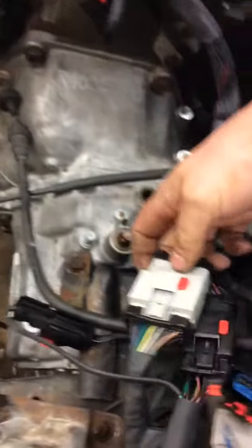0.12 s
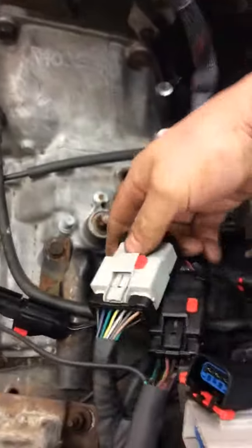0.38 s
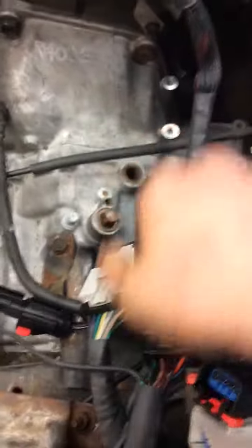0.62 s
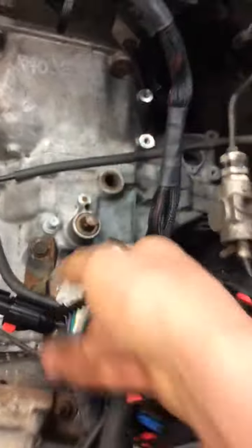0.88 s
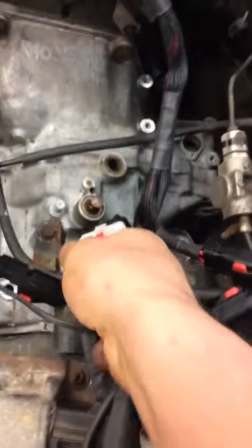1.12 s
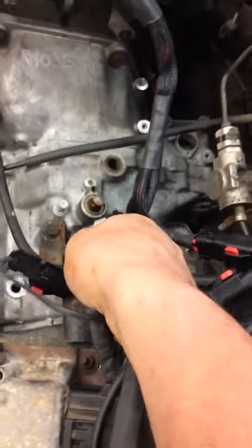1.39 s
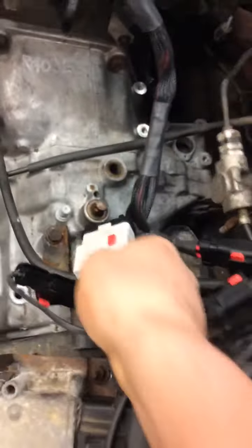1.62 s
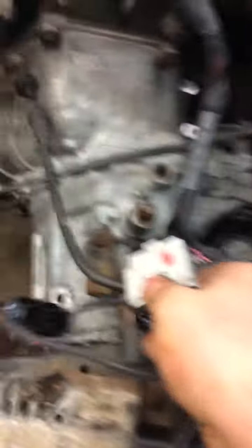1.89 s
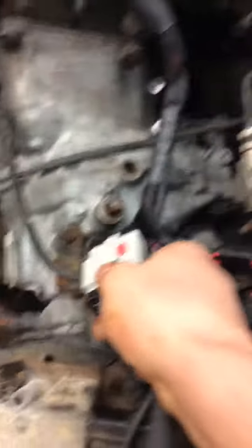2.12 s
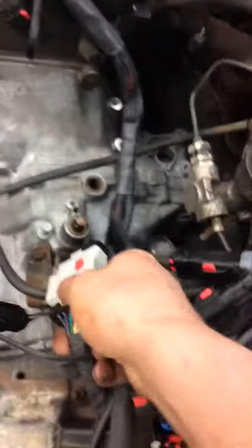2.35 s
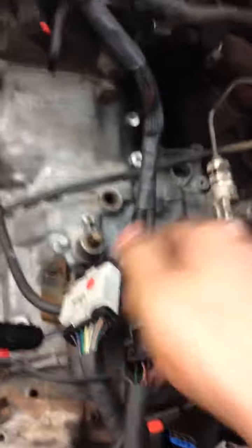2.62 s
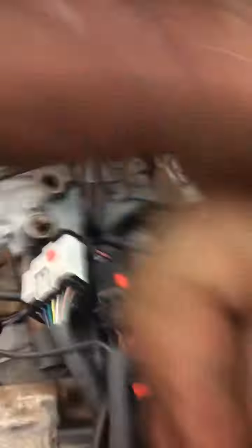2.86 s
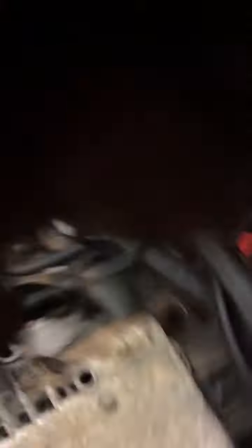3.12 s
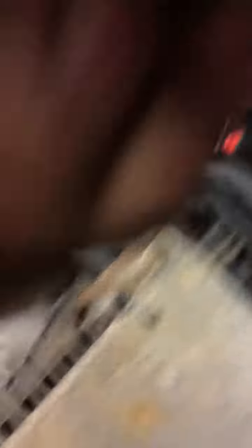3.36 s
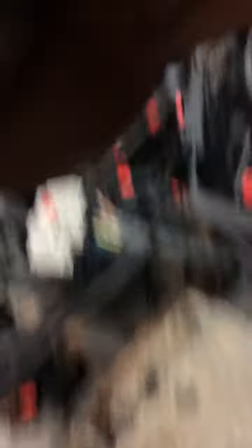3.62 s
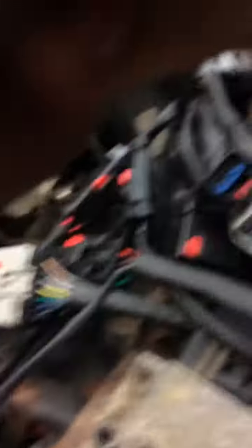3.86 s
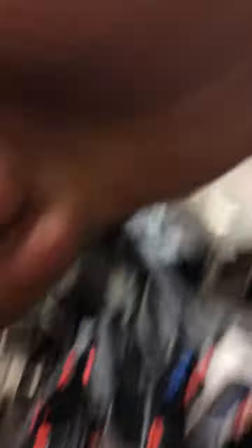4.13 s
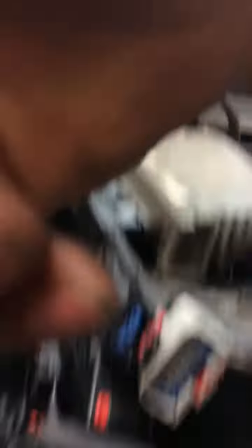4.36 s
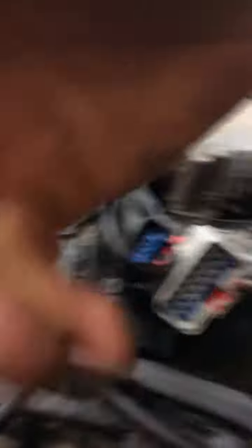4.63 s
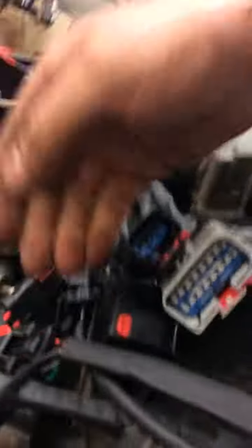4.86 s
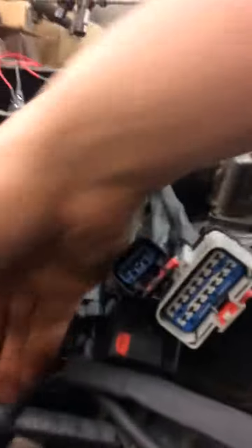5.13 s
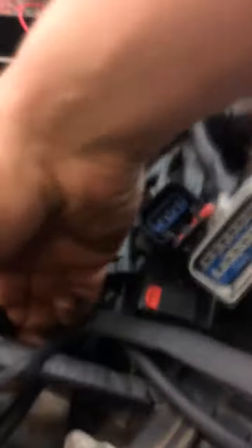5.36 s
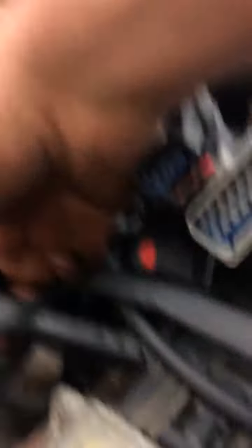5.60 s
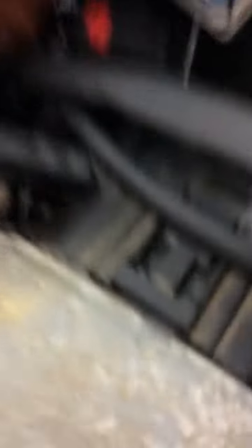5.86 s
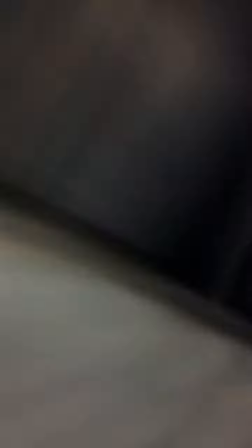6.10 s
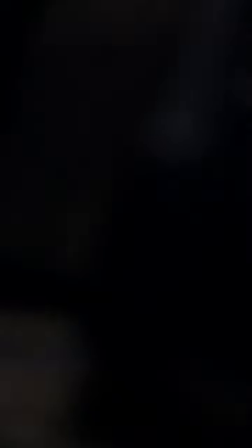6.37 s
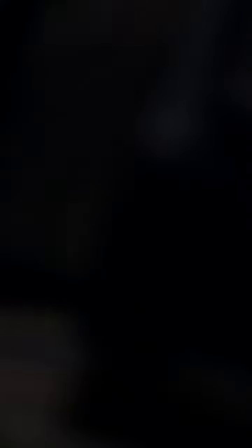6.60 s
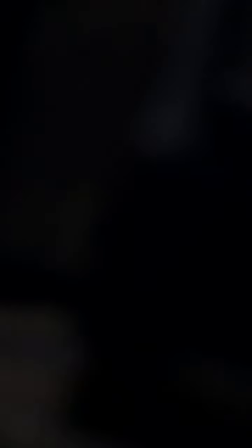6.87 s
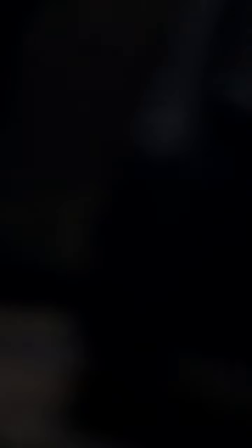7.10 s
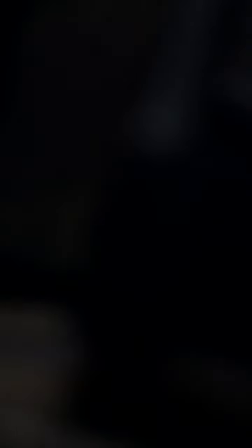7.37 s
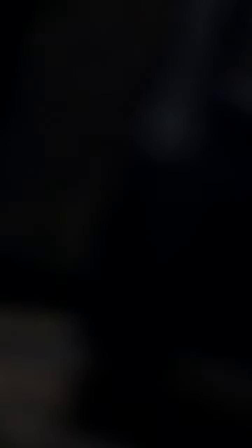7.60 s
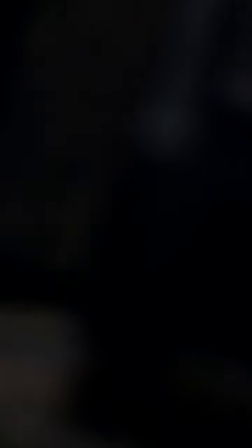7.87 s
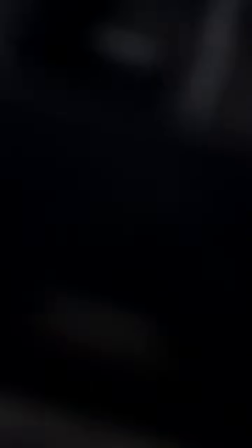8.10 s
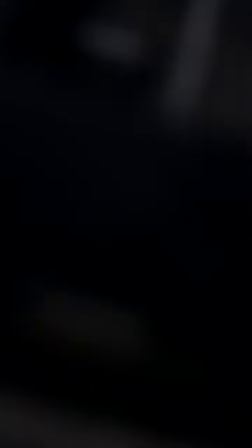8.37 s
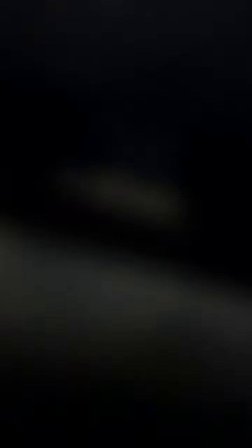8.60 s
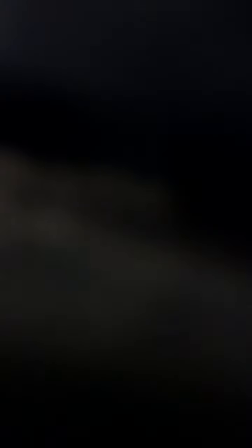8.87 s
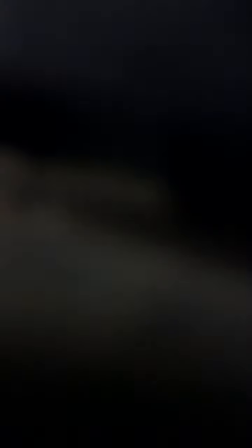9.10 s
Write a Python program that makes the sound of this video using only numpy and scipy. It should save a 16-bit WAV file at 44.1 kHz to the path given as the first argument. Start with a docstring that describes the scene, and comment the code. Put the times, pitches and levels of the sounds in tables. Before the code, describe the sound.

Sparse plastic clicks and faint wire crackle near the microphone, then louder knocks, snaps and rattling clatter as wiring plugs are handled over an engine.

```python
"""Faint crackle of taped wires and small plastic clicks, then louder clatter: hands pull wiring plugs apart
over an engine, close to a hand-held phone in a quiet shop. Clicks are noise blows ringing plastic modes;
the wires are snapping noise shaped by tugs and slides; knocks are low swings through the phone's case.
Fingers hiss as noise; quick runs of sharp kicks creak and buzz; a faint whine is gliding narrow noise."""
import sys
import numpy as np
from scipy import signal
from scipy.fft import rfft, irfft
from scipy.io import wavfile

SR = 44100
rng = np.random.default_rng(int(sys.argv[2]) if len(sys.argv) > 2 else 0)


def gain_from_db(level_db):
    """Turn a decibel level (scalar or array-like) into a linear amplitude factor."""
    decades = np.asarray(level_db, float) / 20
    return 10 ** decades


def wav_record(signal):
    """Record a signal, one row per channel, as 16-bit PCM in the file named by sys.argv[1]."""
    frames = np.transpose(np.atleast_2d(signal))
    bounded = np.clip(frames, -1, 1)
    # unit amplitude maps onto the largest positive 16-bit level
    quanta = np.round(bounded * 32767).astype(np.int16)
    wavfile.write(sys.argv[1], SR, quanta)


N = 407043
PORT_HZ = 8700  # resonance of the microphone port


def evened(x):
    """Scales to rms 1."""
    return x / np.sqrt(np.mean(x ** 2) + 1e-20)


def peaked(x):
    """Scales to peak 1."""
    return x / (abs(x).max() + 1e-20)


def coloured(x, points):
    """Shapes x by a spectrum, interpolated over log frequency, and scales to rms 1."""
    f, db = np.transpose(points)
    hz = np.fft.rfftfreq(len(x), 1 / SR)
    gain_db = np.interp(np.log(hz + 1), np.log(f + 1), db)
    return evened(irfft(rfft(x) * gain_from_db(gain_db), len(x)))


def resonate(x, hz, width_hz):
    """Two-pole resonance of about unit gain at hz."""
    r = np.exp(-np.pi * width_hz / SR)
    return signal.lfilter([1 - r * r, 0, r * r - 1], [2, -4 * r * np.cos(2 * np.pi * hz / SR), 2 * r * r], x)


def treble(x, hz):
    """High-pass, second order."""
    return signal.sosfilt(signal.butter(2, hz, "high", fs=SR, output="sos"), x)


def add(mix, s, sound):
    """Mixes sound in at time s."""
    part = mix[max(round(s * SR), 0):][:len(sound)]
    part += sound[:len(part)]


def crackle(per_s, spread_db, grain_s, smooth):
    """Noise whose level jumps with each small snap and dies away, over a smooth share."""
    snap_here = rng.random(N) < per_s / SR
    size = gain_from_db(spread_db * np.minimum(rng.exponential(1, N), 4)) * snap_here
    level = signal.lfilter([1], [1, -np.exp(-1 / (grain_s * SR))], size)
    return (evened(level) + smooth) * rng.standard_normal(N)


def swell(t, start, length, peak, edge_db, lift_db_per_s):
    """Level in dB of one stroke: an arch over its length, falling away steeply outside."""
    u = (t - start) / length
    from_peak = np.where(u < peak, (peak - u) / peak, (u - peak) / (1 - peak))
    outside_s = np.maximum(np.maximum(start - t, t - start - length), 0)
    return -edge_db * np.minimum(from_peak, 1) ** 2 - lift_db_per_s * outside_s


# plastic clicks and clatter:
# (time [s], body peak [dB], main ring [Hz], scatter t60 before limits [s], treble relative to body [dB])
CLICK_HITS = [(0.1673, -36, 6600, 0.026, -5), (0.2582, -40.5, 2830, 0.016, 2.5),
              (0.3215, -37.5, 6400, 0.025, -0.5), (0.7572, -40.5, 5100, 0.26, 0),
              (1.027, -29.5, 973, 0.049, -4.5), (1.0255, -15, 3490, 0.037, -6.5),
              (1.1035, -18.5, 4650, 0.097, -6), (1.1095, -17.5, 1940, 0.04, -1),
              (1.144, -28, 3820, 0.032, -11), (1.151, -33, 1970, 0.022, -21),
              (1.438, -47.5, 870, 0.061, -4), (1.5468, -46.5, 815, 0.13, 5),
              (1.604, -37.5, 2930, 0.017, -8.5), (1.7684, -18, 4150, 0.0068, -2.5),
              (1.8082, -30, 1700, 0.034, 8), (1.896, -49.5, 930, 0.058, 5.5), (2.1361, -42, 1040, 0.11, 13),
              (2.1815, -29, 3040, 0.045, 7.5), (2.2155, -30, 1590, 0.022, -35),
              (2.228, -38.5, 1590, 0.06, -34), (2.5552, -49.5, 2090, 0.074, 5),
              (3.185, -25.5, 7050, 0.067, 0.5), (3.4617, -5, 7000, 0.003, -3),
              (3.543, -30.5, 577, 0.025, -31), (3.6091, -41, 604, 0.033, -27),
              (3.7606, -12, 610, 0.0036, -27), (3.7773, -27, 2030, 0.039, -3),
              (3.835, -35.5, 730, 0.02, -12), (4.0617, -23, 710, 0.01, -22), (4.1133, -23.5, 576, 0.025, 2),
              (4.516, -16, 718, 0.0091, -16.5), (4.5326, -10, 790, 0.0063, -17.5),
              (4.552, -24.5, 3320, 0.032, 2.5), (4.7481, -20.5, 2430, 0.009, -6),
              (5.063, -41, 3030, 0.04, -24), (5.1125, -24.5, 4750, 0.014, -6),
              (5.17, -32, 5950, 0.015, 4.5), (5.2632, -37.5, 1610, 0.06, -1),
              (5.3431, -18, 794, 0.008, -18), (5.413, -22, 1460, 0.0088, -32),
              (5.431, -21.5, 1564, 0.028, -20), (5.7773, -25, 950, 0.03, 5),
              (5.869, -34.5, 1070, 0.045, -8.5), (5.92, -47, 1462, 0.044, 2.5),
              (6.192, -9, 1086, 0.03, -10.5), (6.2632, -5, 1090, 0.0034, -15),
              (6.2737, -12.5, 1290, 0.0038, -10), (6.2825, -20, 2000, 0.008, -4),
              (6.3522, -8.5, 1295, 0.035, -10), (6.372, -4, 1470, 0.0068, -6),
              (6.39, -7.5, 1930, 0.012, -10.5), (6.45, -32, 1420, 0.02, 1),
              (6.761, -38.5, 620, 0.094, -38.5), (6.8, -34.5, 2000, 0.025, -5),
              (6.8165, -39, 1490, 0.012, -12), (6.82, -40, 620, 0.036, -40),
              (6.859, -35.5, 4300, 0.1, -1.5), (7.098, -46.5, 710, 0.06, -32.5),
              (7.2538, -35.5, 3490, 0.041, -16), (7.296, -36.5, 1770, 0.066, -33),
              (7.328, -26.5, 1970, 0.015, -6), (7.4353, -36.5, 5000, 0.045, 4.5),
              (7.5498, -34, 1820, 0.017, -4), (7.592, -39, 2050, 0.028, -36),
              (7.6082, -34, 1740, 0.0057, -25), (7.6203, -34.5, 4430, 0.03, -2),
              (7.7245, -30, 446, 0.093, -11), (7.7775, -37.5, 650, 0.058, -44), (7.89, -22, 6600, 0.053, 1),
              (7.9118, -15, 4130, 0.027, 2), (7.9274, -23.5, 4100, 0.019, 1.5),
              (7.971, -37, 760, 0.084, -38), (8.2407, -29, 2570, 0.013, -8),
              (8.4892, -7, 1930, 0.019, -7.5), (8.4948, -10.5, 1660, 0.047, -2),
              (8.5364, -19.5, 3600, 0.015, -5), (8.5567, -21, 2020, 0.013, -8),
              (8.567, -11.5, 688, 0.0042, -8), (8.5762, -6.5, 5780, 0.021, -6),
              (8.5917, -9.5, 930, 0.005, -28), (8.622, -14.5, 3370, 0.011, -3),
              (8.6285, -4.5, 2160, 0.0093, -35), (8.6505, -10.5, 2080, 0.031, -7.5),
              (8.6635, -10, 2270, 0.035, -27), (8.6925, -5, 2270, 0.013, -19),
              (8.699, -5, 4020, 0.046, -12.5), (8.7838, -31, 5840, 0.043, 4),
              (8.8035, -29, 4840, 0.015, -1), (8.818, -19, 5300, 0.028, 4), (8.8449, -18, 4450, 0.04, -0.5),
              (8.898, -11.5, 4950, 0.036, -6), (8.9175, -21.5, 5300, 0.033, -2),
              (8.9598, -37.5, 1490, 0.036, -30), (8.983, -39, 1790, 0.03, -7),
              (9.061, -22.5, 2070, 0.053, -15), (9.074, -22.5, 1930, 0.027, 1),
              (9.148, -33.5, 3570, 0.049, -0.5), (9.199, -34, 5640, 0.021, -12)]
# faint ticks of wire ends and latches: (time [s], body peak [dB], main ring [Hz])
TICK_HITS = [(0.566, -38, 7500), (2.991, -56, 3320), (5.974, -60, 638), (6.014, -43, 1210),
             (6.529, -46, 5160), (6.594, -43.5, 4780), (6.832, -37, 2000), (7.196, -47, 1770),
             (7.992, -43, 1460), (8.266, -43, 600), (8.3622, -45.5, 3300), (8.41, -47, 690)]
TICK_T60_S, TICK_TREBLE_DB = 0.0089, 1.5


def clicks():
    """A crack and a dying scatter of contacts ring the struck part and the modes around it."""
    out, t = np.zeros(N), np.arange(7000) / SR
    hits = CLICK_HITS + [(*tick, TICK_T60_S, TICK_TREBLE_DB) for tick in TICK_HITS]
    dull = signal.butter(2, 6000, fs=SR, output="sos")
    for (s, db, hz, t60, treble_db), grit in zip(hits, rng.standard_normal((len(hits), len(t)))):
        length = np.clip(t60, .004, .2)
        scatter = gain_from_db(-60 * t / length) * (1 - np.exp(-t / (0.024 * length)))  # long ones build up more slowly
        crack = gain_from_db(1.5 - 60 * t / 0.0033)
        blow = grit * (abs(grit) * scatter + crack) * (1 - np.exp(-t / 0.00019))
        near = resonate(resonate(blow, hz, 2.2 * hz), hz, 2 * hz)
        touch_db = 5 * grit[-len(HOUSING_MODES):]
        rings = resonate(blow, hz, .13 * hz) + gain_from_db(2) * housing(near, touch_db, length)
        ping = resonate(blow, hz, max(0.045 * hz, 2 / length))
        ping *= np.linalg.norm(rings) / np.linalg.norm(ping)
        ping_db = -3 + .5 * max(-6 - treble_db, 0)  # dull knocks ring more purely
        body = rings + gain_from_db(-1.0) * near + gain_from_db(ping_db) * ping
        top = resonate(treble(blow, 3200), PORT_HZ, 3800) + gain_from_db(-6.5) * treble(blow, 9500)
        add(out, s, gain_from_db(db) * (peaked(signal.sosfilt(dull, body)) + gain_from_db(treble_db) * peaked(top)))
    return out


# modes of plugs and loom: (frequency [Hz], level [dB], decay scale before limits [s])
HOUSING_MODES = [(457, 10, 0.0099), (688, 11.5, 0.011), (1023, 2, 0.013), (1484, 6, 0.0066),
                 (1720, -10.5, 0.0078), (2084, 0, 0.0032), (2510, -5.5, 0.0035), (3200, 0, 0.0061),
                 (3600, -5, 0.017), (4540, -12.5, 0.014), (5950, -16, 0.072)]


def housing(x, weights_db, held_s=np.inf):
    """Modes of plugs and loom, weighted by where the part is touched; held_s caps their decay scale."""
    out = 0
    for (hz, db, decay_s), weight_db in zip(HOUSING_MODES, weights_db):
        width_hz = 1.7 / min(max(decay_s, .008), held_s)
        out = out + gain_from_db(db + weight_db) * resonate(x, hz, width_hz)
    return out


# metal under the plugs: (frequency [Hz], level [dB], decay scale [s])
CASTING_MODES = [(930, 2.5, 0.22), (1400, -7, 0.13), (1790, -10.5, 0.094), (1930, 0, 0.087),
                 (2870, -10, 0.063), (3490, -4.5, 0.12), (3900, -8.5, 0.15), (4300, -4.5, 0.095),
                 (4650, -3.5, 0.15), (5780, -0.5, 0.069)]
CASTING_UNTIL_S = 2.7


def casting(blows):
    """Narrow modes of the metal casting, set ringing by the early blows, with the energy of those blows."""
    early = blows * (np.arange(N) < CASTING_UNTIL_S * SR)
    ring = sum(gain_from_db(db) * np.sqrt(decay_s) * resonate(early, hz, 5 / min(decay_s, .15))
               for hz, db, decay_s in CASTING_MODES)
    return ring * np.linalg.norm(early) / np.linalg.norm(ring)


def engine_bay(x):
    """Short dense reflections off the metal nearby."""
    t = np.arange(SR // 3) / SR
    signs = rng.choice([-1., 0, 0, 0, 0, 0, 0, 0, 0, 1.], len(t))  # one tap in five
    taps = signs * gain_from_db(-60 * t / 0.041) * (t > .002)
    return signal.oaconvolve(x, taps / np.linalg.norm(taps))[:N]


# knocks through the case: (time of envelope peak [s], swing level [dB], frequency [Hz], t60, at least 0.015 [s])
KNOCKS = [(1.0469, -26.5, 338, 0.062), (1.12, -24, 321, 0.057), (1.14, -42.5, 131.4, 0.61),
          (1.812, -37, 194.6, 0.19), (1.833, -54, 197, 0.84), (2.2, -46, 191, 0.4), (3.159, -40, 78, 0.047),
          (3.4616, -5.5, 123.5, 0.015), (3.544, -26, 177, 0.059), (3.7599, -9, 188.2, 0.021),
          (3.836, -18, 162, 0.028), (4.0652, -21.5, 211, 0.025), (4.1139, -14.5, 314, 0.013),
          (4.517, -20.5, 233, 0.018), (4.532, -10.5, 270, 0.011), (4.5547, -22.5, 188.0, 0.035),
          (4.746, -26.5, 159, 0.066), (5.113, -20, 385, 0.05), (5.3455, -17, 257, 0.036),
          (5.413, -13, 275, 0.012), (5.784, -28, 239, 0.017), (6.1905, -16, 172, 0.017),
          (6.206, -23, 469, 0.12), (6.2657, -18.5, 168, 0.042), (6.2756, -31, 287, 0.013),
          (6.3537, -13.5, 120.5, 0.044), (6.3754, -18, 151, 0.014), (6.3976, -20.5, 96, 0.05),
          (7.2445, -44, 404, 0.03), (7.733, -35, 147.5, 0.12), (7.9476, -35.5, 324, 0.079),
          (8.478, -17.5, 193, 0.013), (8.491, -15, 190, 0.011), (8.56, -22, 287, 0.15),
          (8.5824, -16, 375, 0.036), (8.6043, -9, 181, 0.065), (8.633, -12, 178.0, 0.014),
          (8.6527, -17, 143, 0.14), (8.727, -34.5, 193.3, 0.43), (9.0842, -28, 319, 0.18)]


def thumps():
    """A push through the case: a short shove and a few dry swings, roughened by low grit."""
    out, t = np.zeros(N), np.arange(-400, 12000) / SR
    for (s, db, hz, t60), grit in zip(KNOCKS, rng.standard_normal((len(KNOCKS), len(t)))):
        shove = 0.33 * gain_from_db(-60 * abs(t) / 0.0071)
        swing = shove + np.sin(2 * np.pi * hz * t) + 0.43 * evened(resonate(grit, hz, 84))
        envelope_db = np.where(t < 0, 60 * t / 0.0058, -60 * t / max(t60, .015))
        add(out, s + t[0], gain_from_db(db) * swing * gain_from_db(envelope_db))
    return treble(out, 64)


# spectra of bending wires and gripped case: (frequency [Hz], level per Hz [dB])
RUSTLE_SPECTRUM = [(240, -39), (400, -4), (650, 5.5), (1280, 4), (1990, 4), (5000, -25), (6500, -36.5),
                   (11000, -120)]
SIZZLE_SPECTRUM = [(2350, -12.5), (4000, -6), (9810, -9), (14700, -14.5), (15800, -19.5)]
RUMBLE_SPECTRUM = [(15, -65.5), (25, -27.5), (54, -1), (274, -1.5), (454, -12.5), (600, -8), (780, -37.5),
                   (1320, -120)]
# low case modes that the grip sets humming: (frequency [Hz], level [dB], width [Hz])
CASE_MODES = [(197, 0.5, 38), (326, 2, 34), (440, -3, 46)]


def handling():
    """Taped wires crackle and sizzle as they bend; the grip rumbles through the case."""
    rustle_gain, sizzle_gain, rumble_gain = motion()
    snaps = crackle(per_s=140, spread_db=1.5, grain_s=0.007, smooth=0.9)
    lumps = crackle(per_s=150, spread_db=2.5, grain_s=.012, smooth=1.2)
    # the hold shifts, so do the modes
    steps = np.arange(0, N + 3000, 3000)
    grip_db = [np.interp(np.arange(N), steps, w)
               for w in rng.uniform(-18, 8, (len(HOUSING_MODES), len(steps)))]
    plastic = coloured(housing(snaps, grip_db), [(3000, -4.0), (7000, -9.5)])
    rustle = evened(coloured(snaps, RUSTLE_SPECTRUM) + gain_from_db(3.0) * plastic)
    hum = sum(gain_from_db(db + w) * resonate(lumps, hz, width) for (hz, db, width), w in zip(CASE_MODES, grip_db))
    rumble = evened(coloured(lumps, RUMBLE_SPECTRUM) + gain_from_db(3.5) * evened(hum))
    sizzle = coloured(snaps, SIZZLE_SPECTRUM)
    return rustle_gain * cupped(rustle) + sizzle_gain * sizzle + rumble_gain * rumble


# sudden tugs on the loom:
# (time [s], rustle level [dB], sizzle relative to rustle [dB], weight on the case relative to rustle [dB])
LOOM_TUGS = [(1.043, -34, -10.5, -6.5), (1.118, -26.5, -15, -9), (1.808, -32, -6, -39),
             (2.184, -39, -2, -7), (3.772, -23, -36, -11.5), (4.537, -37, -13.5, 5),
             (5.126, -37, -1.5, -6.5), (5.351, -46, -8, 17.5), (5.423, -35.5, -16.5, 4.5),
             (6.204, -29, -12, -4), (6.351, -34, 2, 8.5), (7.901, -36, -6, -3), (8.491, -35.5, -2.5, 8),
             (8.591, -26.5, -45, 2), (8.701, -29.5, -8, -30), (9.064, -44, 6.5, 4)]
TUG_RISE_DB_PER_S, TUG_FALL_DB_PER_S = 900.5, [298.5, 312, 201.5]  # falls: rustle, sizzle, rumble
# slow slides of hand and wires: (start [s], length [s], rustle level [dB],
# sizzle relative to rustle [dB], weight on the case relative to rustle [dB])
HAND_SLIDES = [(-.1, 0.44, -63.5, -2.5, -8.5), (0.064, 0.53, -68, 2.5, 9.5), (0.459, 0.2, -77, 15.5, 16),
               (0.686, 0.69, -61, 8, -4.5), (1.123, 0.51, -71.5, 4.5, 5.5), (1.42, 0.37, -67, -3, 8),
               (1.697, 0.31, -55, -2.5, 3), (2.261, 0.52, -81.5, 12.5, 6), (3.079, 0.33, -60, -1.5, -3.5),
               (3.36, 0.13, -55, -16, 3), (3.502, 0.23, -54.5, -22, 2.5), (3.77, 0.3, -57.5, -32, -2),
               (3.983, 0.2, -53, -30, 8), (4.108, 0.039, -36.5, 6, 5.5), (4.679, 0.14, -48.5, -10.5, 2),
               (4.762, 0.23, -46, -14, -10.5), (4.862, 0.32, -49, -17, -17), (5.042, 0.2, -51.5, 0, -1),
               (5.22, 0.13, -51.5, -5, -1), (5.33, 0.58, -70, 2, -7), (5.523, 0.32, -64, -1.5, 9),
               (5.616, 0.24, -47.5, -8.5, -12), (5.699, 0.14, -39.5, -5, -0.5),
               (5.74, 0.38, -62, -2.5, 10.5), (5.991, 0.13, -53.5, -5, -11), (6.074, 0.19, -68.5, 8.5, 10),
               (6.198, 0.14, -27, -16.5, -3), (6.289, 0.1, -38.5, -3, -14), (6.433, 0.48, -76.5, 5.5, 8),
               (6.683, 0.33, -66.5, 12.5, 8.5), (6.921, 0.16, -71, 12.5, 10.5), (7.043, 0.2, -74.5, 7, 12),
               (7.188, 0.22, -56, -7.5, 0.5), (7.373, 0.12, -57.5, -1, 1.5), (7.462, 0.38, -63, 4, 9.5),
               (7.658, 0.14, -45.5, -7.5, -5), (7.746, 0.36, -62.5, 3, 17), (8.086, 0.13, -45.5, -4.5, -13),
               (8.156, 0.29, -66.5, 1.5, 5.5), (8.506, 0.22, -22, -11.5, -4), (8.732, 0.31, -56, 8, 6),
               (8.914, 0.18, -59.5, -8, 14.5), (9.143, 0.42, -47, 1, 5)]


def motion():
    """Gains of rustle, sizzle and rumble: the powers of all tugs and slides add."""
    t = np.arange(0, N, 44) / SR
    power, fall = np.zeros((3, len(t))), np.array(TUG_FALL_DB_PER_S)[:, None]
    for s, db, sizzle_db, weight_db in LOOM_TUGS:
        shape_db = np.where(t < s, TUG_RISE_DB_PER_S * (t - s), -fall * (t - s))
        power += gain_from_db(db + np.array([[0], [sizzle_db], [weight_db]]) + shape_db) ** 2
    for s, length, db, sizzle_db, weight_db in HAND_SLIDES:
        shape_db = swell(t, s, length, peak=0.34, edge_db=25, lift_db_per_s=505)
        power += gain_from_db(db + np.array([[0], [sizzle_db], [weight_db]]) + shape_db) ** 2
    return [np.interp(np.arange(N) / SR, t, np.sqrt(p)) for p in power]


CUP_FROM_S, CUP_TO_S, CUP_FADE_S = 4.64, 5.09, .03
CUP_HZ, CUP_SHIFT = 775, .08  # approximate echo rate; share by which the two echoes lie above and below
CUP_ECHO, CUP_DULL = .5, .35  # feedback; the palm swallows treble at each bounce


def cupped(x):
    """While the hand is cupped, x echoes between palm and case, in a wandering blend of two spacings."""
    echoes = []
    for hz in CUP_HZ * (1 - CUP_SHIFT), CUP_HZ * (1 + CUP_SHIFT):
        back = np.zeros(round(SR / hz))
        back[0], back[1], back[-1] = 1, -CUP_DULL, -CUP_ECHO * (1 - CUP_DULL)
        echoes.append(evened(signal.lfilter([1, -CUP_DULL], back, x)))
    steps = np.arange(0, N, 2000)
    tight = np.interp(np.arange(N), steps, rng.random(len(steps)))
    share = np.interp(np.arange(N) / SR,
                      [CUP_FROM_S - CUP_FADE_S, CUP_FROM_S, CUP_TO_S, CUP_TO_S + CUP_FADE_S], [0, 1, 1, 0])
    return (1 - share) * x + share * (tight * echoes[1] + (1 - tight) * echoes[0])


# finger strokes over the microphone port: (start [s], length [s], skin hiss level [dB])
STROKES = [(3.154, 0.067, -37.5), (3.206, 0.1, -46), (3.318, 0.025, -42.5), (3.371, 0.103, -35),
           (3.468, 0.099, -68), (3.539, 0.09, -45.5), (3.63, 0.057, -54.5), (3.693, 0.17, -51),
           (3.869, 0.094, -62.5), (3.957, 0.031, -46), (4.002, 0.1, -52), (4.121, 0.028, -40)]
# skin hiss, and the top that firmer strokes add: (frequency [Hz], level per Hz [dB])
SKIN_SPECTRUM = [(1000, -19.5), (2300, -18.5), (6300, -9.5), (9100, 4), (12000, -8.5), (15500, -17.5)]
FIRM_SPECTRUM = [(5000, -19.5), (12000, -4), (15500, -3)]


def rubs():
    """Skin sliding over the port: dense hiss with a broad hump near the port resonance."""
    skin = crackle(per_s=320, spread_db=5.0, grain_s=0.0019, smooth=4.5)
    t = np.arange(0, N, 44) / SR
    power = 0
    for s, length, db in STROKES:
        shape_db = swell(t, s, length, peak=0.54, edge_db=9.5, lift_db_per_s=6008)
        power = power + gain_from_db(db + shape_db) ** 2
    level = np.interp(np.arange(N) / SR, t, np.sqrt(power))
    firmness = np.sqrt(level / gain_from_db(-36.5))
    return level * (coloured(skin, SKIN_SPECTRUM) + firmness * coloured(skin, FIRM_SPECTRUM))


# quick runs of sharp kicks, a creak and then two faint buzzing rattles:
# (start [s], length [s], gap before growth and jitter [s], level before fade, soft start and scatter [dB])
KICK_RUNS = [(3.755, 0.15, 0.0032, -1.5), (5.338, 0.085, .0055, -31), (5.427, 0.1, 0.0034, -33)]
KICK_COUNT, GAP_GROWTH, GAP_JITTER = 24, 1.052, .3
KICK_FADE_DB, KICK_SCATTER_DB, SOFT_START_DB = 1.0, 7, 7  # the first two kicks are softer


def kick_runs():
    """Sharp kicks in quick runs that slow and weaken; each rings the port briefly."""
    out, t, k = np.zeros(N), np.arange(300) / SR, np.arange(KICK_COUNT)
    for start, length, gap, first_db in KICK_RUNS:
        late, scatter = rng.uniform(-1, 1, (KICK_COUNT, 2)).T
        gaps = gap * GAP_GROWTH ** k
        times = start + np.cumsum(gaps) - gaps[0] + GAP_JITTER * gaps * late
        soft_db = SOFT_START_DB * np.maximum(2 - k, 0)
        levels_db = first_db - KICK_FADE_DB * k - soft_db + KICK_SCATTER_DB * scatter
        for s, db, grit in zip(times, levels_db, rng.standard_normal((KICK_COUNT, 300))):
            kick = (1 + 2.5 * grit) * gain_from_db(-60 * t / 0.00026) * (s < start + length)
            ring = resonate(resonate(kick, PORT_HZ, 2500), 11000, 6200)
            add(out, s, gain_from_db(db) * peaked(ring))
    return out


# faint airy whine:
# (start [s], length [s], level at the middle [dB], first pitch [Hz], rise [Hz/s], half-width [Hz])
AIRY_WHINE = (2.6, .62, -81, 2330, 1000, 130)


def whine():
    """Noise in a narrow band that glides upward: slow noise on a rising carrier."""
    start, length, db, hz, rise, width = AIRY_WHINE
    t, out = np.arange(0, length, 1 / SR), np.zeros(N)
    phase = 2 * np.pi * np.cumsum(hz + rise * t) / SR
    low_pass = signal.butter(1, width, fs=SR, output="sos")
    slow = signal.sosfilt(low_pass, rng.standard_normal((2, len(t))))
    band = evened(slow[0] * np.cos(phase) + slow[1] * np.sin(phase))
    add(out, start, gain_from_db(db) * np.sqrt(np.hanning(len(t))) * band)
    return out


# background of the shop: (frequency [Hz], level per Hz [dB])
SHOP_SPECTRUM = [(18, -56.5), (30, -37), (117, -4.5), (164, -12.5), (197, -11), (230, -18), (9190, -35.5),
                 (15500, -29)]


def shop():
    """Steady noise of the quiet shop, mostly low."""
    return gain_from_db(-71.5) * coloured(rng.standard_normal(N), SHOP_SPECTRUM)


def scene():
    """All sources in one channel."""
    blows = clicks()
    struck = blows + gain_from_db(-31.5) * engine_bay(blows) + casting(blows) + thumps()
    return (struck + handling() + rubs() + kick_runs() + whine() + shop())[None]


def band_limit(x):
    """A steep low-pass at the top of the band."""
    return signal.sosfilt(signal.butter(12, 16480, fs=SR, output="sos"), x)


def record(dry):
    """The microphone rolls off at the top; then a steep band limit."""
    soft = signal.sosfilt(signal.butter(2, 13000, fs=SR, output="sos"), dry)
    narrow = signal.oaconvolve(soft, signal.firwin(255, 15900, fs=SR)[None], "same")
    return band_limit(narrow)


dry = scene()
out = record(dry)
wav_record(out)
```